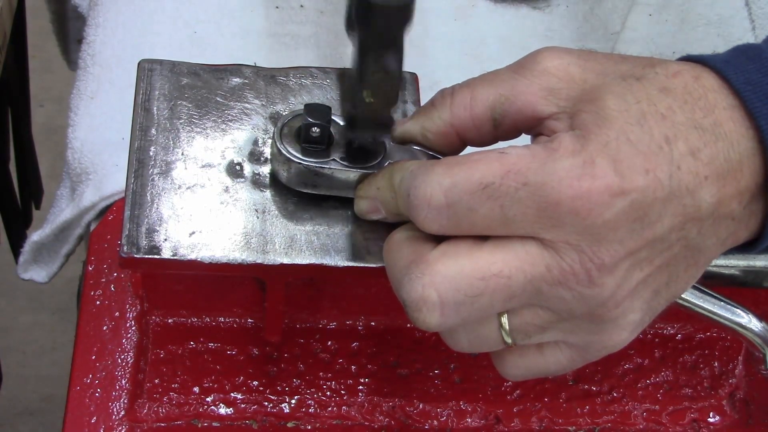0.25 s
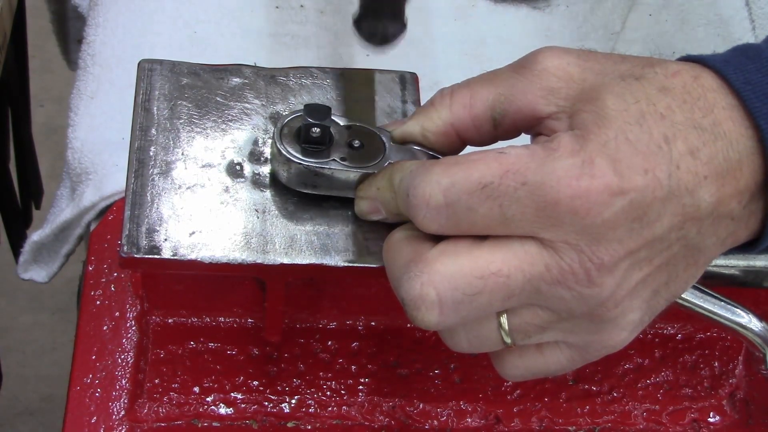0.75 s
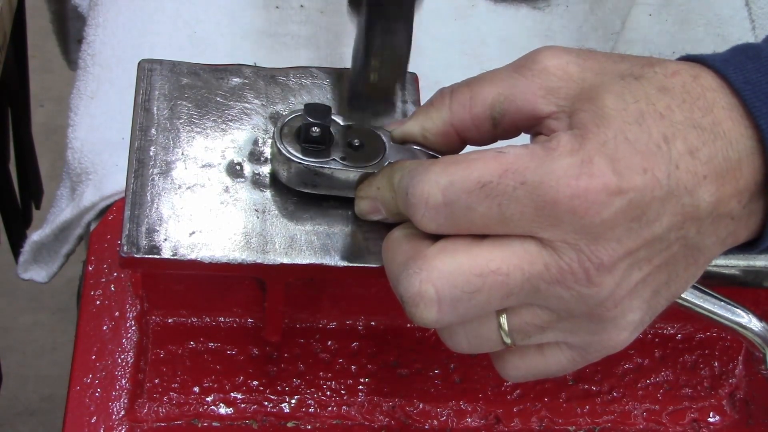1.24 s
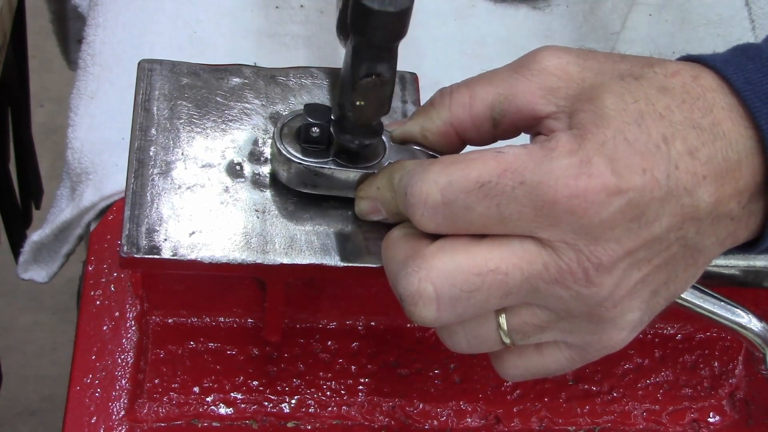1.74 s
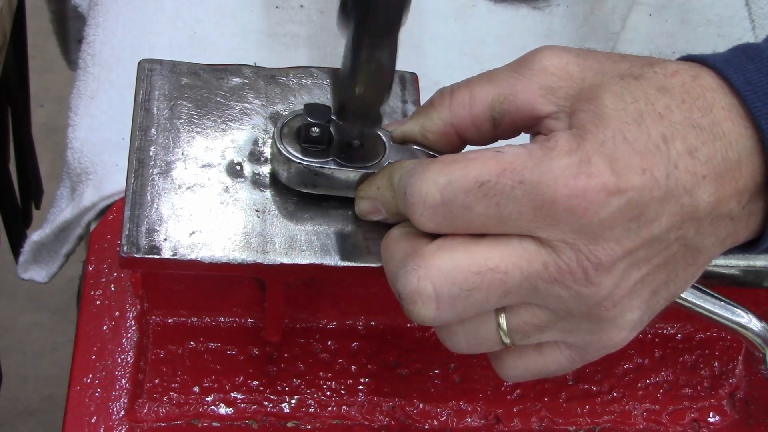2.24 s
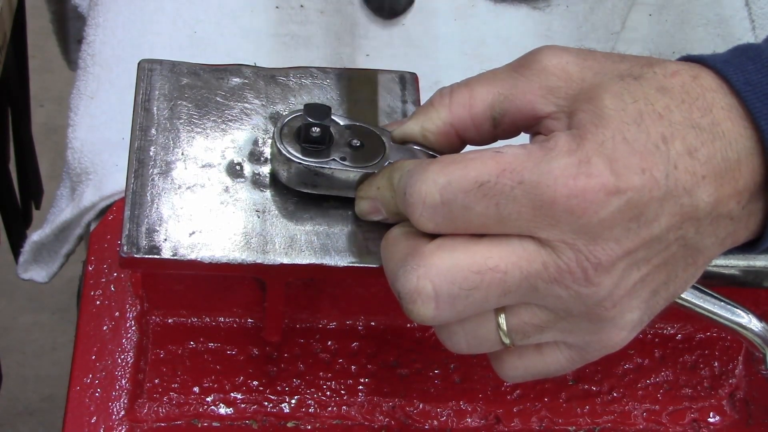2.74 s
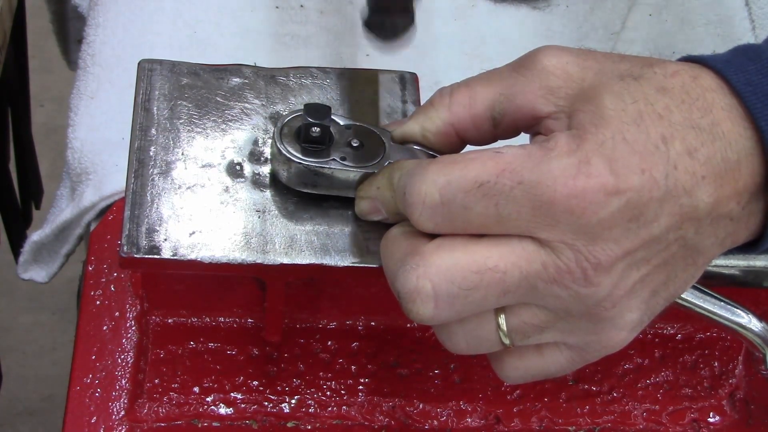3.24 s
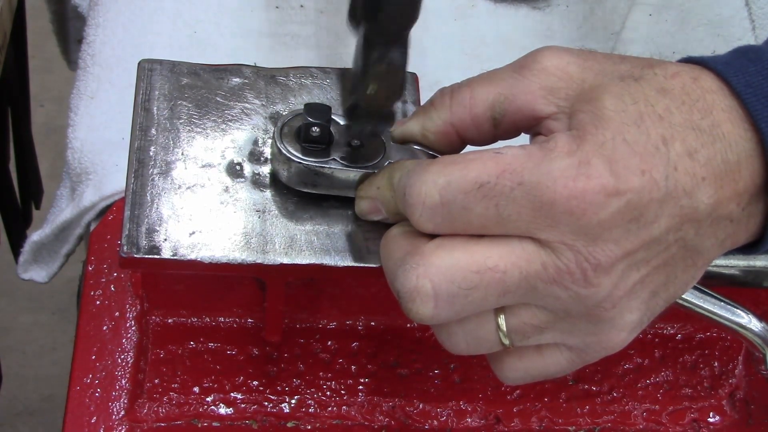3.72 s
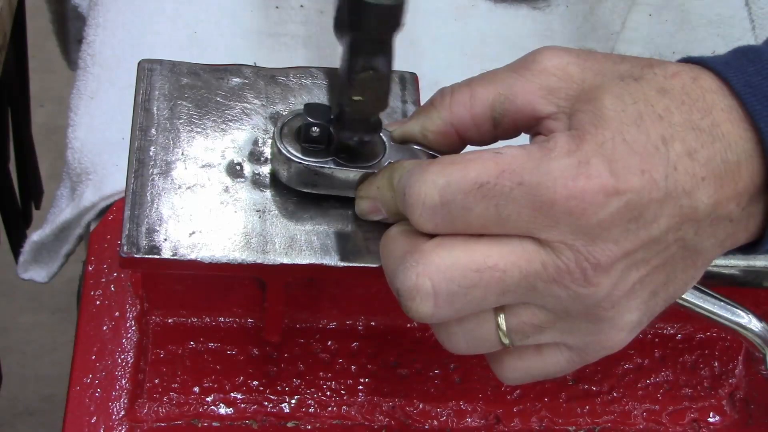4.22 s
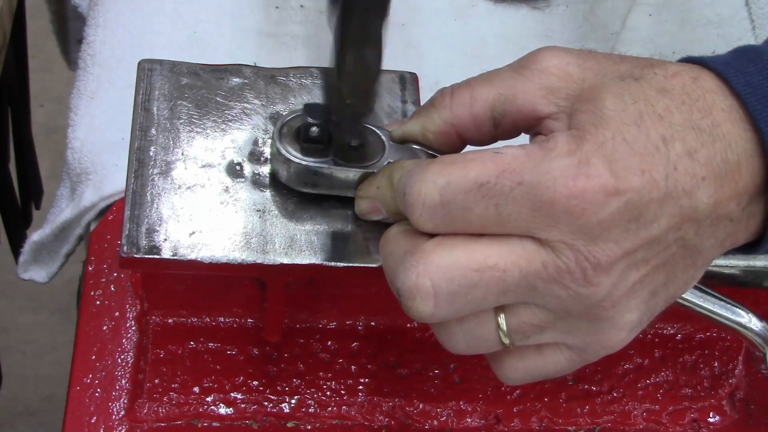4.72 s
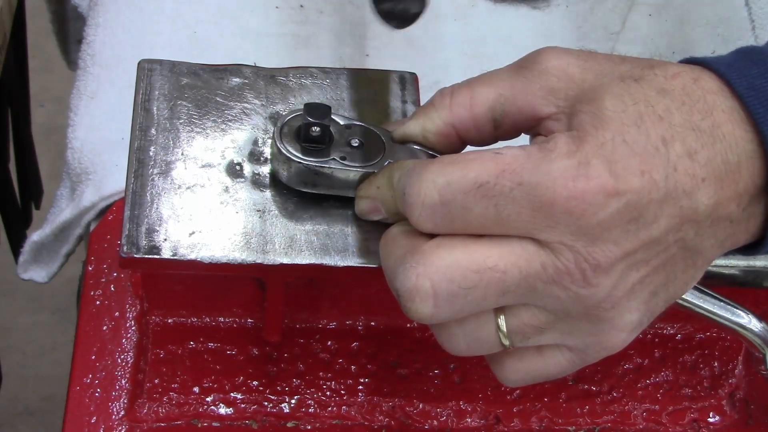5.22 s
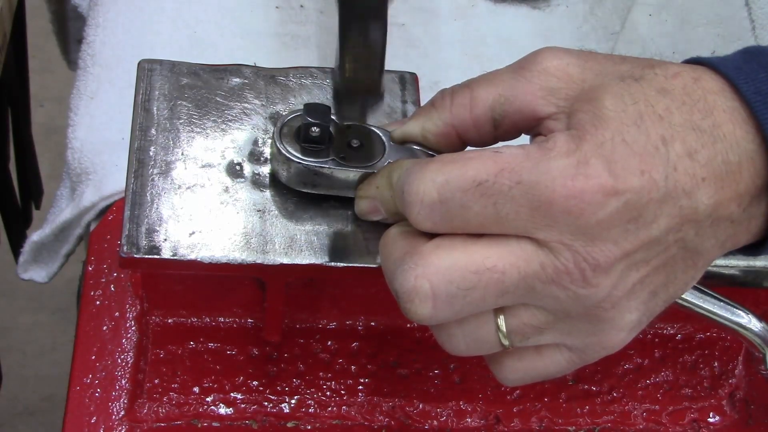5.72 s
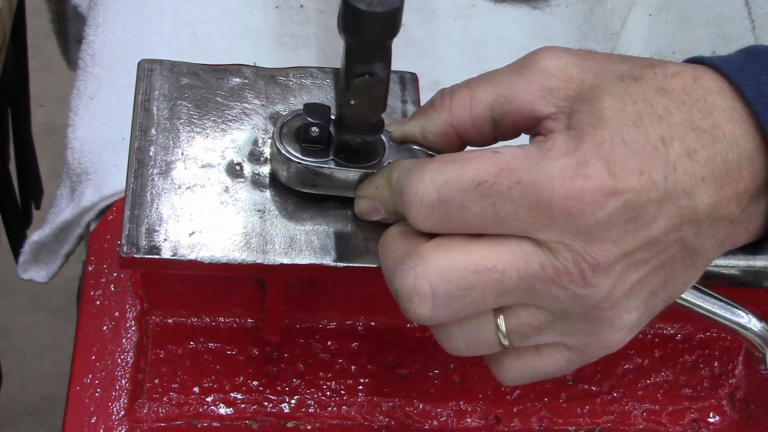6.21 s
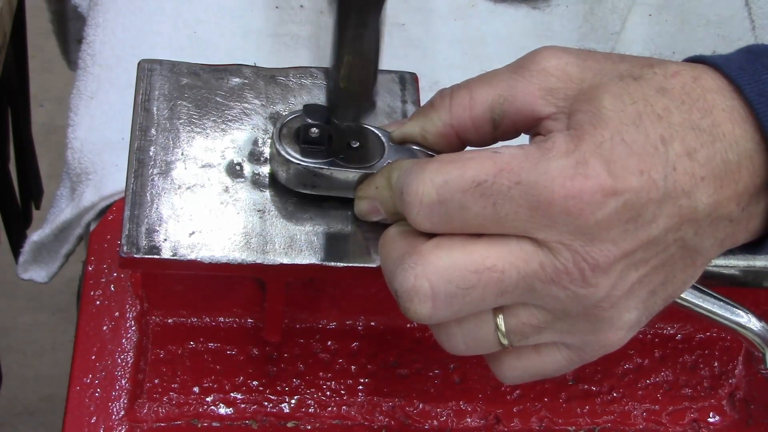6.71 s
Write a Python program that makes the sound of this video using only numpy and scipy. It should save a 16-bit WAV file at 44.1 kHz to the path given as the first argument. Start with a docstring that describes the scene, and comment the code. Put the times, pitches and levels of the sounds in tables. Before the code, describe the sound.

Close to the microphone, a small hammer strikes a pin in a wrench head held on a steel anvil. Hard, bright, finger-damped clinks come evenly, between three and four a second, from the first instant to the end. Each has a sharp crack, a very short steel ring and a low stand thump; some have a quick rebound click. A bare workshop's reverberation fills the gaps over faint air.

```python
"""A small hammer taps a pin in a ratchet wrench held on a steel anvil block, in a bare workshop.
Each tap excites damped modes and short noise bursts: a crack on the pin, then a steel ring and a stand thump.
Ring and thump begin when the wrench meets the anvil, up to a few milliseconds later; the hammer often rebounds once.
Decaying noise forms the reverberation, over the faint steady noise of still air.
The recorder's limiter ducks at the loud blows, so the room swells up just behind them."""
import sys
import numpy as np
from scipy import signal
from scipy.fft import rfft, irfft
from scipy.io import wavfile

SR = 44100
rng = np.random.default_rng(int(sys.argv[2]) if len(sys.argv) > 2 else 0)


def persist_wave(psi):
    """Save psi, clipped to +-1, as 16-bit WAV."""
    counts = np.round(np.clip(psi, -1, 1) * 32767).astype(np.int16)
    wavfile.write(sys.argv[1], SR, np.atleast_2d(counts).T)


N = 306936

# Hammer taps. Each row: start in seconds, force in dB, steel ring left by the grip of the fingers in dB,
# delay in seconds until the wrench meets the anvil (0: it lies flush), and delay in seconds until the
# hammer falls back (0: it is lifted clear; a rebound sounds only if later than the landing).
HAMMER_TAPS = [(0.0, -4.5, -14.5, 0, 0.0038), (0.284, -1, -14.5, 0, 0), (0.563, 0, -14, 0.0034, 0.028),
               (0.848, -2.5, -17.5, 0.0063, 0.0023), (1.1583, -4.5, -17, 0.0061, 0.011),
               (1.4434, 1, -10, 0.00025, 0.022), (1.719, -1, -6, 0.0034, 0.023),
               (2.009, 0, -5.5, 0.0022, .023), (2.2873, 0.5, -6, 0, 0), (2.5685, 2, -5.5, 0.00087, .018),
               (2.8398, 2, -5.5, 0.0024, 0), (3.1234, 2.5, -7, 0.002, 0.027),
               (3.392, 1, -13, 0.0063, 0.006), (3.6804, -1.5, -4.5, 0.0057, 0.0013),
               (3.943, 0.5, -5.5, 0.0037, 0.023), (4.2312, 1, -8.5, 0.0061, 0.027),
               (4.4982, 1, -4.5, .004, 0.03), (4.7715, -1, -15, .005, 0.0012),
               (5.0547, -0.5, -6, 0.00044, 0.035), (5.3386, -4.5, -11, 0.0068, 0),
               (5.6311, -1, -5.5, 0.006, 0.043), (5.9164, -5, -10, 0.0061, 0.00086),
               (6.2022, -2, -5, 0.0031, 0), (6.4634, -5, -15.5, 0.0048, 0),
               (6.762, -3.5, -15.5, 0.0095, .03)]
# Hammer, wrench and anvil ringing together.
# Each row: frequency in Hz, relative level in dB, time to decay by 60 dB in seconds.
STEEL_MODES = [(2955, 0, .04), (2355, -3.5, .05), (5380, -8.5, .035), (7910, -6.5, .035), (2737, -7, .045),
               (1638, -13.5, .055), (2550, -11, .025), (2830, -12, .025), (3110, -5, .025),
               (1500, -19, .04), (1710, -15.5, .05), (1924, -17, .04), (3563, -14, .025), (3842, -16, .04),
               (5030, -15, .025), (6352, -21, .03), (7515, -17, .06), (7720, -13, .03), (9859, -28, .07),
               (12520, -34, .03)]
# The pin and the wrench head, damped by the fingers.
# Each row: frequency in Hz, relative level in dB, time to decay by 60 dB in seconds.
PIN_MODES = [(2355, -7, .065), (1195, -18, .035), (2945, -9, .035), (3350, -4, .014), (4080, 0, .009),
             (4600, -1, .009), (5050, -6, .01), (7520, -7, .012), (8800, -8, .008), (10500, -14, .008)]
# The stand under the anvil.
# Each row: frequency in Hz, relative level in dB, time to decay by 60 dB in seconds.
STAND_MODES = [(166, -11, 0.15), (244.5, 1.5, 0.12), (280.2, -1, 0.15), (425.5, -9, 0.14),
               (499.7, -6.5, 0.096), (582.8, -6.5, 0.11), (634, -8.5, 0.044), (778, -9.5, 0.096),
               (1225, 3, 0.049)]
# Dense resonances of the crack, the ring and the thump.
# Each row: frequency in Hz, relative spectral density in dB per Hz.
CRACK_SPECTRUM = [(100, -36), (900, -10), (2000, -26.5), (3200, 3), (4600, -2), (6400, -14), (8000, -6),
                  (11000, -18), (15500, -34)]
RING_SPECTRUM = [(100, -38), (900, -13), (1700, -9), (2100, -9), (2900, 4), (4200, -11.5), (5300, -10.5),
                 (6500, -16.5), (7900, -8.5), (9500, -25), (15500, -37)]
THUMP_SPECTRUM = [(40, -44), (120, -31), (250, 1), (350, -4.5), (550, -4.5), (1000, -6.5), (1500, -3),
                  (3000, -14), (9000, -45)]
# The workshop's reverberation.
# Each row: frequency in Hz, relative gain in dB, time to decay by 60 dB in seconds.
REVERBERATION = [(60, -5, 1), (130, 3, 0.52), (234, 1, 0.77), (580, 9, 0.88), (1050, 0, 0.88),
                 (1940, -1.5, 1), (2310, -6, 1), (2980, -8.5, 0.8), (4180, -5.5, 0.68), (6000, -8.5, 0.57),
                 (8220, -13.5, 0.44), (9800, -16, 0.43), (15000, -5, .33)]
# Still air of the workshop. Each row: frequency in Hz, relative spectral density in dB per Hz.
AIR_SPECTRUM = [(25, -14), (80, -12), (150, 1), (1000, -3.5), (5000, -18), (16000, -53)]

# layer levels in dB; the rebound is relative to the force of its tap
CRACK_DB, RING_DB, THUMP_DB, REBOUND_DB = -13, 11, -20, -10.5
ROOM_DB, AIR_DB = -1.5, -42.5
DETUNE = 0.3  # random shift of a mode, as a fraction of its resonance width
# a flush wrench hardly cracks; the loss fades exponentially as the landing delay grows
FLUSH_LOSS_DB, LOOSE_S = 10.5, 0.0016
GRIP_CRACK = 0.29  # dB of crack gained per dB of ring that the grip takes away
LIMIT_DB, CLIP_LEVEL = 0.0, 0.93  # limiter threshold in dB, clipping amplitude
CUTOFF_HZ = 16000


def from_db(db):
    """Amplitude ratio: 20 dB is a factor of ten."""
    return 10 ** (np.asarray(db) / 20)


def at_hz(table, hz, axis=1):
    """Linear interpolation of one table column along a logarithmic frequency axis."""
    table = np.array(table)
    log_hz = np.log(np.maximum(hz, 1))
    return np.interp(log_hz, np.log(table[:, 0]), table[:, axis])


def coloured_noise(spectrum, size):
    """Spectral shaping: white noise weighted in frequency, then scaled to an rms of 1."""
    hz = np.fft.rfftfreq(size, 1 / SR)
    white = rfft(rng.standard_normal(size))
    noise = irfft(white * from_db(at_hz(spectrum, hz)), size)
    return noise / noise.std()


def add(track, s, sound):
    """Superposition: a sound adds to the track from time s in seconds."""
    start = max(round(s * SR), 0)
    part = sound[:max(N - start, 0)]
    track[start:start + len(part)] += part


def struck(modes, spread_db, detune, size):
    """Modal superposition: spot and grip vary the mode strengths, and shift the damped modes most."""
    hz, db, t60 = np.array(modes).T[:, :, None]
    t = np.arange(size) / SR
    strength, shift = rng.standard_normal((2, len(modes), 1))
    sign = rng.choice([-1, 1], (len(modes), 1))
    # a faster decay means a wider resonance
    width_hz = np.log(1000) / (np.pi * t60)
    mode_hz = hz + detune * shift * width_hz
    envelope = from_db(db + spread_db * strength - 60 * t / t60)
    return np.sum(sign * envelope * np.sin(2 * np.pi * mode_hz * t), axis=0)


def clack(spectrum, t60, size):
    """High modal density: resonances too close to tell apart act as quickly decaying noise."""
    decay = from_db(-60 * np.arange(size) / SR / t60)
    return coloured_noise(spectrum, size) * decay


def pin_crack():
    """Impact of hard bodies: the hammer face meets the pin in a bright, short sound."""
    ping = struck(PIN_MODES, spread_db=1.5, detune=DETUNE, size=4096)
    dense = clack(CRACK_SPECTRUM, t60=0.045, size=4096)
    return ping + from_db(4.0) * dense


def steel_ring(rise_s):
    """Gradual excitation: the ring swells while the wrench beds down on the anvil, then dies quickly."""
    modes = struck(STEEL_MODES, spread_db=2.0, detune=DETUNE, size=6000)
    dense = clack(RING_SPECTRUM, t60=0.052, size=6000)
    swell = 1 - np.exp(-np.arange(6000) / SR / rise_s)
    return (modes + from_db(-4.5) * dense) * swell


def stand_thump():
    """Structural transmission: the blow passes through the anvil and shakes its heavy stand."""
    modes = struck(STAND_MODES, spread_db=1.37, detune=DETUNE, size=9000)
    dense = clack(THUMP_SPECTRUM, t60=0.1, size=9000)
    swell = 1 - np.exp(-np.arange(9000) / SR / 0.0015)
    return (modes + from_db(3.5) * dense) * swell


def hammering():
    """Common excitation: the force of a tap drives its crack, its ring and thump, and any rebound."""
    steel, stand = np.zeros((2, N))
    for s, force_db, grip_db, settle_s, rebound_s in HAMMER_TAPS:
        flush_db = FLUSH_LOSS_DB * np.exp(-settle_s / LOOSE_S)
        crack_db = CRACK_DB + force_db - GRIP_CRACK * grip_db - flush_db
        landing = s + settle_s
        add(steel, s, from_db(crack_db) * pin_crack())
        add(steel, landing, from_db(RING_DB + force_db + grip_db) * steel_ring(rise_s=0.00046))
        add(stand, landing, from_db(THUMP_DB + force_db) * stand_thump())
        if rebound_s > settle_s:
            add(steel, s + rebound_s, from_db(REBOUND_DB + force_db) * steel_ring(rise_s=0.00022))
    # small steel parts radiate no bass
    bass_cut = signal.butter(2, 500, "high", fs=SR, output="sos")
    return stand + signal.sosfilt(bass_cut, steel)


def room_response(build_s, early_db, early_s, size=44100):
    """Diffuse reverberation: noise decays band by band, with an early boost for the bench reflections."""
    t, hz = np.arange(size) / SR, np.fft.rfftfreq(size, 1 / SR)
    edges = np.geomspace(30, 18000, 28)
    noise = rfft(rng.standard_normal(size)) * from_db(at_hz(REVERBERATION, hz))
    tail = np.zeros(size)
    for low, high in zip(edges, edges[1:]):
        t60 = at_hz(REVERBERATION, np.sqrt(low * high), axis=2)
        band = irfft(noise * ((hz >= low) & (hz < high)), size)
        tail += band * from_db(-60 * t / t60)
    bench = 1 + from_db(early_db) * np.exp(-t / early_s)
    build_up = 1 - np.exp(-t / build_s)
    return tail * bench * build_up / np.sqrt(SR / 20)


def still_air(level_db):
    """Stationary noise: the air of the workshop is a steady coloured hiss."""
    return from_db(level_db) * coloured_noise(AIR_SPECTRUM, N)


def microphone_difference(near, room_side):
    """Close spacing: the two microphones differ only slightly, mostly in the treble."""
    # the gradient stands for a small path difference, which grows with frequency
    side = from_db(-18.0) * room_side + from_db(-25.0) * np.gradient(near)
    side = signal.sosfilt(signal.butter(1, 1200, "high", fs=SR, output="sos"), side)
    return side + still_air(AIR_DB - 22.0)


def scene():
    """Sum and difference: both channels share direct sound, room and air; the side has opposite signs."""
    near = hammering()
    responses = [room_response(build_s=0.00054, early_db=-4.0, early_s=0.0059) for _ in range(2)]
    room, room_side = (from_db(ROOM_DB) * signal.fftconvolve(near, response)[:N] for response in responses)
    middle = near + room + still_air(AIR_DB)
    side = microphone_difference(near, room_side)
    return middle + side * np.array([[1], [-1]])


def limiter(x, threshold_db, release_db_per_s, attack_s):
    """Peak limiting: the gain drops fast at a peak and climbs back at a steady rate in dB."""
    peak_db = 20 * np.log10(np.abs(x).max(axis=0) + 1e-9)
    over = np.maximum(peak_db - threshold_db, 0)
    climb = release_db_per_s * np.arange(N) / SR
    # a running maximum on a rising ramp lets each peak fall off linearly
    held = np.maximum.accumulate(over + climb) - climb
    r = np.exp(-1 / (attack_s * SR))
    reduction_db = signal.lfilter([1 - r], [1, -r], held)
    return x * from_db(-reduction_db)


def record(dry):
    """Band and amplitude limits: low cut, limiter, clipping of peaks that outrun it, and top cut."""
    low_cut = signal.butter(2, 70, "high", fs=SR, output="sos")
    thinned = signal.sosfilt(low_cut, dry * from_db(3.5))
    limited = limiter(thinned, threshold_db=LIMIT_DB, release_db_per_s=242.0, attack_s=0.00054)
    clipped = np.clip(limited, -CLIP_LEVEL, CLIP_LEVEL)
    return signal.sosfiltfilt(signal.butter(10, CUTOFF_HZ, fs=SR, output="sos"), clipped)


dry = scene()
out = record(dry)
persist_wave(out)
```